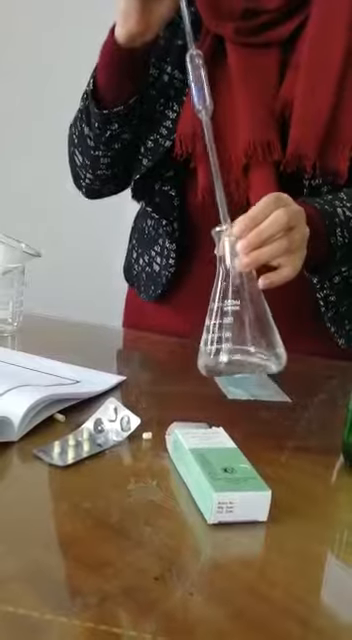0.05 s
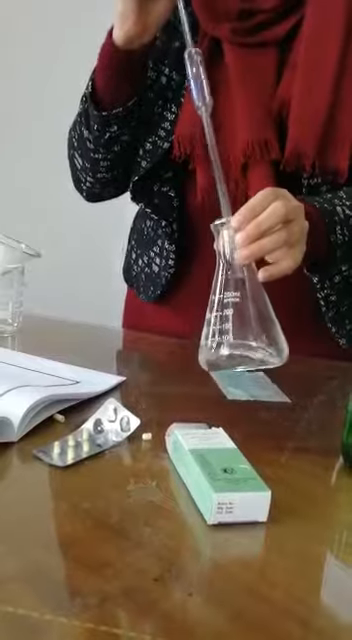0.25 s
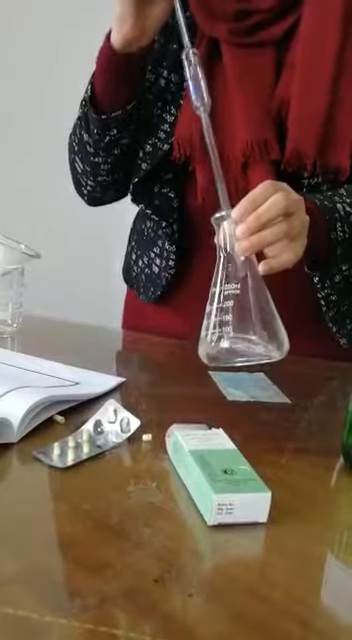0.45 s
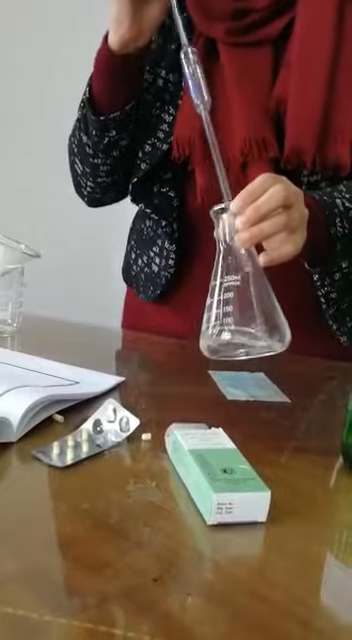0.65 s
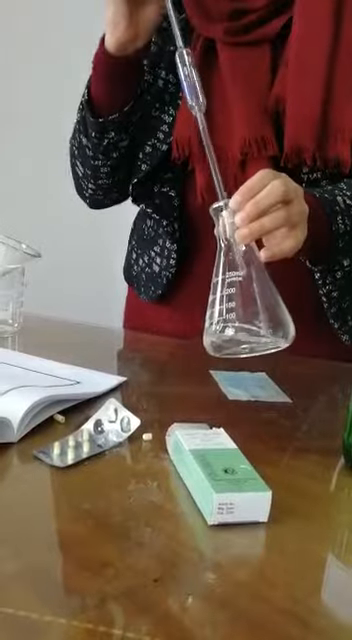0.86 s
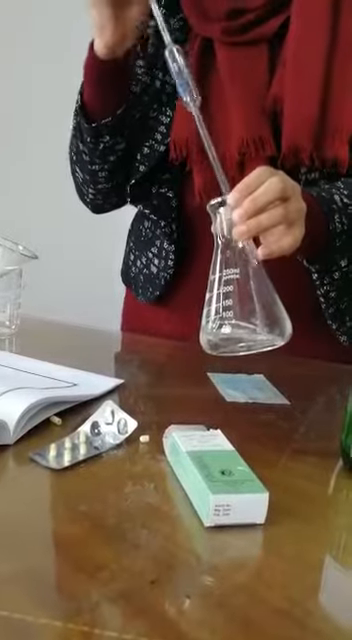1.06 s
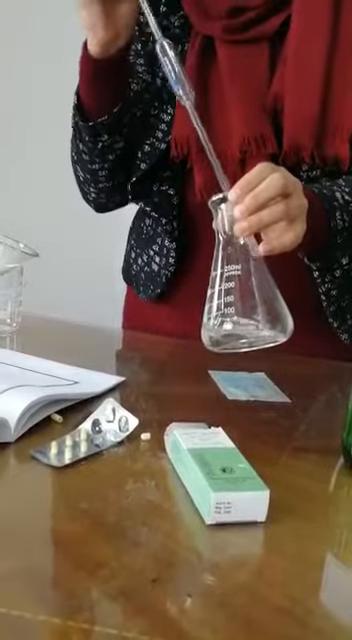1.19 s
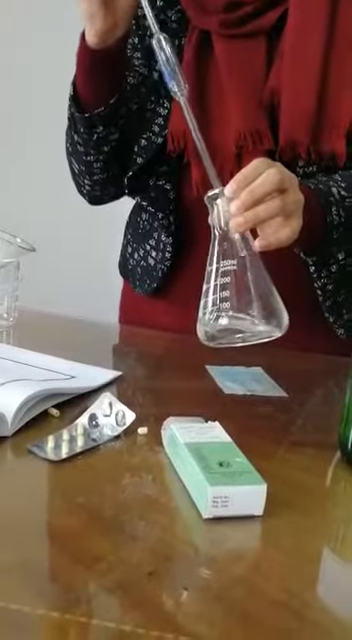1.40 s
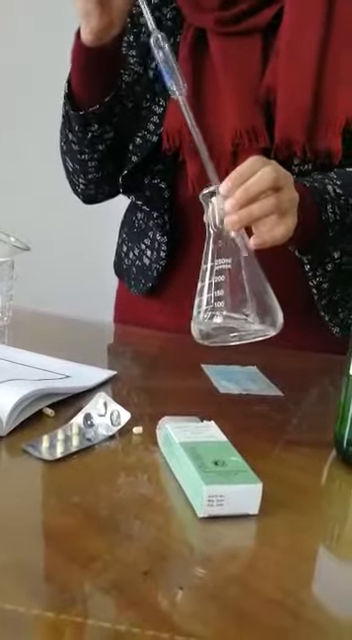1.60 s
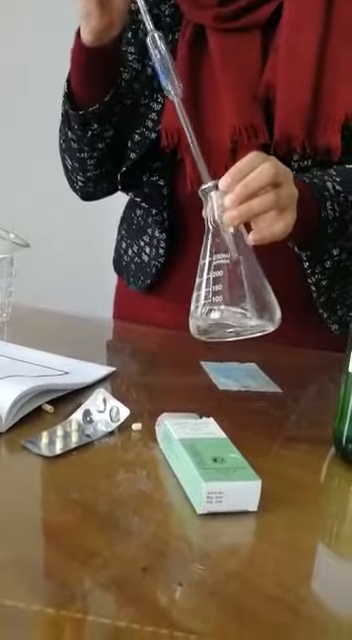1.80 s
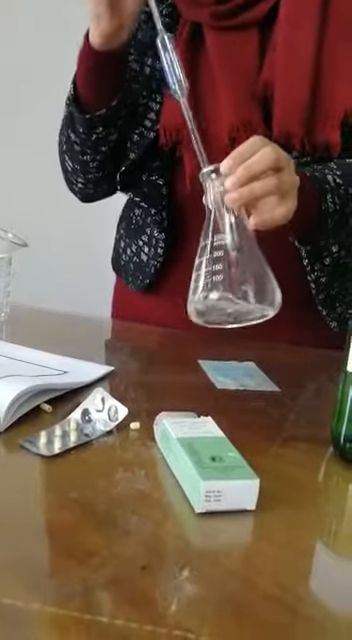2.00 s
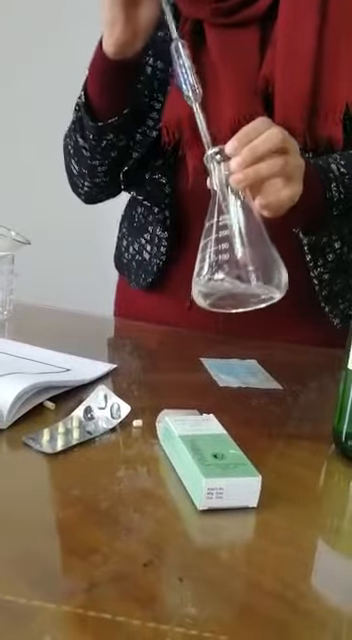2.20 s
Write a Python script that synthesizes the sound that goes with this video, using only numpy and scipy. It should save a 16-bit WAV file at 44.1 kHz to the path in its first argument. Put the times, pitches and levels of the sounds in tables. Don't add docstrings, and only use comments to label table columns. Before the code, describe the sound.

A glass pipette drags lightly on a conical flask's neck, then clinks against its rim and walls in irregular single knocks with small rebounds, hardest past the middle; close stereo microphone, small room, quiet hum, distant sparrows.

```python
import sys
import numpy as np
from scipy import signal
from scipy.fft import rfft, irfft
from scipy.io import wavfile
from scipy.ndimage import uniform_filter1d, minimum_filter1d

SR = 44100
rng = np.random.default_rng(int(sys.argv[2]) if len(sys.argv) > 2 else 0)


def transcribe(u):
    v = np.clip(np.atleast_2d(u).T, -1, 1)
    q = np.round(v * 32767).astype(np.int16)
    wavfile.write(sys.argv[1], SR, q)


def to_linear_factor(level_db):
    exponent = np.asarray(level_db, float) / 20
    return 10 ** exponent


N = 99225

# start_s, clack_db, ring_db, belly_pitch_hz, belly_db
RIM = [
    (0.222, -13, -32.5, 2998, -47.5),
    (0.4324, -14, -35, 3065, -41.5),
]
WALL = [
    (1.6385, -11, -29.5, 3040, -34),
    (1.6407, -16, -28.5, 2842, -51.5),
]
SHOULDER = [
    (1.9592, -22, -32, 3200, -69),
]
REBOUND = [
    (0.2869, -18, -40, 3050, -52),
    (0.302, -33.5, -39, 3040, -50),
    (0.5243, -24.5, -43.5, 3020, -51),
    (1.7112, -23.5, -34, 2983, -38),
    (1.7215, -37, -39, 2750, -47),
    (1.9928, -27.5, -43.5, 3075, -51),
]
LOW_WALL = [
    (1.0014, -14.5, -35.5, 2916, -42),
]
LIP = [
    (0.6252, -18.5, -27, 3060, -51.5),
]
UPPER_WALL = [
    (1.5039, -16, -32, 2842, -47),
    (1.5058, -19, -32, 3128, -48.5),
]
GRAZE = [
    (1.0359, -26, -32, 2830, -60),
]
CONTACTS = (RIM, WALL, SHOULDER, REBOUND, LOW_WALL, LIP, UPPER_WALL, GRAZE)
# pitch_hz, level_db
SHADOW = [(800, -12.5), (3000, -5.5), (6000, -6.5), (9000, -13.5), (15000, -24)]
RING_SPILL_DB = -4.5


def curve(hz, table, col=1):
    table = np.array(table)
    return np.interp(np.log(hz + 1e-9), np.log(table[:, 0]), table[:, col])


def unit(x):
    return x / np.sqrt(np.mean(x ** 2))


def band(x, lo_hz, hi_hz):
    sos = signal.butter(2, [lo_hz, min(hi_hz, .45 * SR)], "band", fs=SR, output="sos")
    return signal.sosfilt(sos, x)


def fade(t, t60):
    return np.exp(-np.log(1000) * t / t60)


def modes(t, hz, t60, db, spill_db, chance):
    detune, scatter_db = 0.0018, 3
    phase = 2 * np.pi * (hz * (1 + detune * chance[0]))[:, None] * t
    ring = fade(t, t60[:, None]) * to_linear_factor(db + scatter_db * chance[1])[:, None]
    far_gain = to_linear_factor(curve(hz, SHADOW) + spill_db + scatter_db * chance[2])[:, None]
    sign = (-1.) ** np.arange(len(hz))[:, None]
    near = ring * np.sin(phase) * sign
    far = far_gain * ring * np.sin(phase + chance[3][:, None])
    return np.array([near.sum(0), far.sum(0)])


def air():
    # pitch_hz, density_db (dB per Hz)
    air_mid = [(15, -32), (25, -13), (123, -3.5), (476, -21.5), (531, -22), (2220, -26.5), (5730, -29.5),
               (6920, -32), (16000, -40)]
    air_side = [(15, -67), (25, -45.5), (87, -12), (405, -14), (476, -5.5), (695, -19), (840, -15.5),
                (2550, -22.5), (16000, -30.5)]
    # pitch_hz, width_hz, level_db
    hum = [(100.3, 19, -64), (121.5, 8.7, -67.5), (148, 15, -67), (204.4, 10, -72.5), (243, 12, -73),
           (298, 27, -76), (356, 5.4, -79.5), (465.2, 11, -80.5)]
    hz = np.arange(N // 2 + 1) * SR / N

    def tone(gain):
        return unit(irfft(rfft(rng.standard_normal(N)) * gain, N))

    mid = to_linear_factor(-63.5) * tone(to_linear_factor(curve(hz, air_mid)))
    for pitch_hz, width_hz, db in hum:
        mid += to_linear_factor(db) * tone(1 / (1 + ((hz - pitch_hz) / (width_hz / 2)) ** 2))
    side = to_linear_factor(-67) * tone(to_linear_factor(curve(hz, air_side)))
    return mid + side * np.array([[1], [-1]])


def slide():
    # start_s, level_db
    drag = [
        (0, -50),
        (0.049, -58),
        (.12, -59),
        (.17, -70.5),
    ]
    grains = rng.standard_normal((2, N)) * to_linear_factor(1.5 * rng.exponential(size=(2, N)))
    db = np.interp(np.arange(N) / SR, *np.array(drag).T, right=-120)
    tone = 0.78 * band(grains, 2650, 3200)
    tone += 1.1 * band(grains, 3500, 3800)
    tone += .5 * band(grains, 5900, 6400)
    return unit(tone) * to_linear_factor(db) * to_linear_factor(np.array([[0], [-5]]))


def flask_ring(t, hz, t60, db, belly_hz, belly_db, chance):
    ring = modes(t, hz, t60, db, RING_SPILL_DB, chance[1])
    twin_hz = hz * (1 + .006 * chance[0][0])
    ring += modes(t, twin_hz, t60 * .7, db - 5.5, RING_SPILL_DB, chance[2])
    belly_t60_s = np.array([0.24])
    ring += modes(t, np.array([belly_hz]), belly_t60_s, np.array([belly_db]), RING_SPILL_DB, np.zeros((4, 1)))
    return ring


def crack(t, colour, db):
    grit = rng.standard_normal((2, len(t)))
    return to_linear_factor(db) * irfft(rfft(grit) * colour, len(t)) * fade(t, 0.022)


def knocks():
    # pitch_hz, t60_s, then level_db at rim, wall, shoulder, rebound, low wall,
    # lip, upper wall, graze, tick
    pipette = [(1640, .008, -46.5, -34, -20.5, -34, -19, -23.5, -28.5, -40, -42.5),
               (2750, 0.017, -47, -16, -42, -2, -4.5, -29, -24.5, -5.5, 4),
               (3210, 0.01, -47, -8.5, -15.5, -6, -7.5, -45, -18.5, -16.5, 7),
               (3732, 0.014, -39, -9, -15, -3.5, -2.5, -14.5, -23, -21, -12),
               (4130, .03, -21, -25, -21, -20.5, -16, -22.5, -26, -21, -11),
               (6106, 0.02, 8, -1.5, -20, 2.5, -5, 7.5, -8, -2, -10),
               (7083, .033, -8, -4, -22, -10, -7.5, -10, -3.5, -7.5, -25.5),
               (7883, 0.019, 3, -9.5, 1, -3, 4.5, 0.5, -4.5, -8, -0.5),
               (8680, .04, -6, -13, -22.5, -23.5, -22, -6, -28.5, -23.5, -33.5),
               (9367, 0.047, -5.5, -0.5, -3.5, -3.5, 0.5, 1, 3.5, -6, -10),
               (10595, .028, -19, -15, -29, -13, -12.5, -19, -17, -2.5, -27),
               (12150, .03, -18.5, -16, -11, -13, -8.5, -19, -18.5, -17, -27),
               (12830, 0.026, -13, -4, -1, -15.5, -1.5, -4, -7, -20, -25),
               (13070, .02, -10, -9, -2, -10.5, -10.5, -10, -16.5, -18.5, -29)]
    flask = [(2842, 0.3, -28.5, -8.5, -15.5, -9.5, -10, -27, -4.5, -8.5, -8.5),
             (3010, .33, -27, -7.5, -7, -14, -26, -24, -10.5, -14, -17.5),
             (5046, 0.22, -18, -6, -11, -11, -0.5, -20.5, -16, -16, -9.5),
             (5450, .086, 5, -8, 6, -18, -24, -7, -14.5, -10, -22),
             (6080, .2, -15, -19, -8.5, -13.5, -26, -10.5, -4, -11, -20),
             (7120, .1, -2, -4, 1.5, -15, -5.5, -5.5, 1.5, -18, -22),
             (8050, 0.25, -11, -23, -13.5, -4.5, -12, -11.5, -14, -19.5, -2),
             (8560, .13, -4.5, -14.5, -22, -17, -14, -16.5, -19, -17, -18),
             (9465, 0.14, -10.5, 1.5, -4, 0, 5, -11, -1.5, 6.5, -11),
             (10470, .14, -15.5, -15.5, -29, -11, -11.5, -7.5, -11.5, -5.5, -20),
             (11120, .1, -14, -10.5, -8, -9.5, -24, -13, -11, -9.5, -20),
             (12680, .116, -15.5, -17, -15, -16.5, -14.5, -17, -19, -16, -21.5),
             (13220, 0.1, -18, -8.5, -28, -2.5, -17.5, -4.5, -13.5, -20, -20),
             (13850, 0.086, -21.5, -10.5, -26, -22.5, -23, -12, -18, -21, -25)]
    # start_s, level_db
    ticks = [(.001, -48.5), (.009, -58.5), (.014, -57.5), (.018, -54), (0.026, -54.5), (0.03, -58.5),
             (0.0383, -54), (0.048, -60.5), (.065, -64), (.073, -60.5), (0.084, -60.5), (0.101, -53.5),
             (.1055, -53), (0.1087, -45.5)]
    crack_db = [6, 4.5, 8.5, 7, 3, 10.5, 6, 3.5, 9.5]
    tick_ring_db, clack_spill_db = -15, -9
    mute_db, mute_s = -3, .004
    contact_s, lag_s = 0.00023, 0.00065

    out, t = np.zeros((2, N + SR)), np.arange(int(.3 * SR)) / SR
    pip, fla = np.array(pipette).T, np.array(flask).T
    tick_rows = [(s, db, db + tick_ring_db, fla[0][0], db + tick_ring_db) for s, db in ticks]
    spots = (*CONTACTS, tick_rows)
    times = np.sort([row[0] for rows in spots for row in rows] + [N / SR])
    hz = np.arange(len(t) // 2 + 1) * SR / len(t)
    shadow = np.array([0 * hz, curve(hz, SHADOW)])
    spill = np.array([[0], [clack_spill_db]])
    onset = np.sin(np.pi / 2 * np.clip(t / contact_s, 0, 1)) ** 2
    for spot, rows in enumerate(spots):
        pip_db, fla_db = pip[2 + spot], fla[2 + spot]
        colour = to_linear_factor(np.interp(hz, pip[0], pip_db) / 2 + shadow)
        for s, clack_db, ring_db, belly_hz, belly_db in rows:
            chance = rng.standard_normal((3, 4, 14))
            y = flask_ring(t, fla[0], fla[1], fla_db + ring_db, belly_hz, belly_db, chance)
            next_s = times[times > s][0]
            y *= to_linear_factor(mute_db * np.clip((t + s - next_s) / mute_s, 0, 1))
            y += modes(t, pip[0], pip[1], pip_db + clack_db, clack_spill_db, chance[0])
            y += crack(t, colour, clack_db + crack_db[spot] + spill)
            i = int(s * SR)
            out[:, i:i + len(t)] += y * onset
    out[1] = np.roll(out[1], int(lag_s * SR))
    glass_only = signal.butter(3, 2100, "high", fs=SR, output="sos")
    return signal.sosfilt(glass_only, out[:, :N])


def room(x):
    # pitch_hz, t60_s, level_db
    decay = [(1140, 0.7, -18), (2594, 0.31, -15.5), (5000, 0.31, -17.5), (8760, 0.25, -14.5),
             (13500, 0.45, -29.5)]
    gap_s, right_db = 0.0039, -4
    t = np.arange(SR // 2) / SR
    tail = np.zeros((2, len(t)))
    for hz, t60, db in decay:
        noise = unit(band(rng.standard_normal((2, len(t))), hz / 1.353, hz * 1.554))
        tail += to_linear_factor(db) * noise * fade(t, t60) / np.sqrt(t60 * SR / 14)
    tail *= np.clip(t / gap_s, 0, 1)
    return signal.fftconvolve(x[None], tail)[:, :N] * to_linear_factor(np.array([[0], [right_db]]))


def sparrows():
    # start_s, length_s, from_hz, to_hz, level_db
    chirps = [
        (0.108, 0.073, 6260, 3990, -60.5),
        (0.706, 0.15, 6450, 3900, -56.5),
        (1.228, 0.08, 6750, 4230, -63),
        (1.444, 0.053, 5000, 3975, -62),
        (1.839, .08, 5200, 3890, -61.5),
        (2.235, 0.041, 5450, 4500, -59.5),
    ]
    trill_hz, yard_t60_s = 73.1, 0.19
    t, song = np.arange(N) / SR, np.zeros(N)
    for s, length, hi_hz, lo_hz, db in chirps:
        u = np.clip((t - s) / length, 0, 1)
        hz = lo_hz + (hi_hz - lo_hz) * (1 - u) ** 2.2 + 500 * np.sin(2 * np.pi * trill_hz * t)
        song += to_linear_factor(db) * np.sin(np.pi * u) ** 0.21 * np.sin(2 * np.pi * np.cumsum(hz) / SR)
    yard = rng.standard_normal((2, SR // 2)) * fade(t[:SR // 2], yard_t60_s)
    return signal.fftconvolve(song[None], yard / np.sqrt(np.sum(yard[0] ** 2)))[:, :N]


def thuds():
    # start_s, level_db
    dull_knocks = [
        (.2218, -50),
        (0.4342, -61),
        (1.002, -50),
        (1.505, -61),
        (1.6384, -34),
        (1.96, -46),
    ]
    # pitch_hz, t60_s, level_db
    held_modes = [(856, 0.017, 0), (1496, 0.012, -4), (2050, 0.025, -11.5)]
    out, t = np.zeros((2, N + SR)), np.arange(SR // 20) / SR
    for s, db in dull_knocks:
        hz, t60, mode_db = np.array(held_modes).T
        y = modes(t, hz, t60, mode_db + db, 0, rng.standard_normal((4, len(held_modes))))
        i = int(s * SR)
        out[:, i:i + len(t)] += y * np.clip(t / 0.00065, 0, 1)
    return band(out[:, :N], 500, 6000)


def clicks():
    wall_click_db = [14.9, 8.4, 13, 8.2, 7, 13, 9.1, 10]
    out = np.zeros(N)
    for rows, db in zip(CONTACTS, wall_click_db):
        for row in rows:
            out[int(row[0] * SR)] = to_linear_factor(row[1] + db)
    return band(out, 1300, 13000)


def blooms():
    # start_s, pitch_hz, level_db, first_swell_s (after the start), beat_period_s
    pairs = [(0.2225, 2983, -26.5, 0.034, .075), (.2868, 5020, -28.5, 0.071, 0.12),
             (0.4328, 3021, -26.5, 0.034, .1), (.5243, 5015, -37.5, 0.06, 0.059),
             (1.0363, 4993, -29, .026, .046), (1.5063, 2842, -34, .008, 0.028),
             (1.6385, 5036, -40, 0.048, 0.032), (1.7113, 5013, -37.5, 0.062, 0.096),
             (1.9928, 3126, -38, 0.0086, 0.067), (.6254, 7950, -32.5, 0.04, .12),
             (0.6256, 3083, -35, 0.05, 0.17)]
    out, t = np.zeros((2, N + SR)), np.arange(SR // 4) / SR
    for s, hz, db, swell_s, period_s in pairs:
        t60_s = 0.23
        y = modes(t, *np.array([[hz], [t60_s], [db]]), RING_SPILL_DB, np.zeros((4, 1)))
        i = int(s * SR)
        out[:, i:i + len(t)] += y * np.cos(np.pi * (t - swell_s) / period_s)
    return out[:, :N]


def scene():
    glass = knocks() + blooms() + thuds() + slide()
    aimed_hz = 6130
    spread = glass[0] - .6 * band(glass[0], aimed_hz / 1.07, aimed_hz * 1.07)
    to_walls = to_linear_factor(-3.5) * spread + clicks()
    return glass + room(to_walls) + sparrows() + air()


def top_cut(x):
    return signal.sosfilt(signal.butter(12, 16960, fs=SR, output="sos"), x)


def record(dry):
    ceiling, top_hz = .88, 15750
    peak = uniform_filter1d(-minimum_filter1d(-np.abs(dry).max(0), size=89), size=45)
    x = dry * np.minimum(1, ceiling / peak)
    x = signal.sosfilt(signal.cheby1(8, .5, top_hz, fs=SR, output="sos"), x)
    return top_cut(x)


dry = scene()
out = record(dry)
transcribe(out)
```